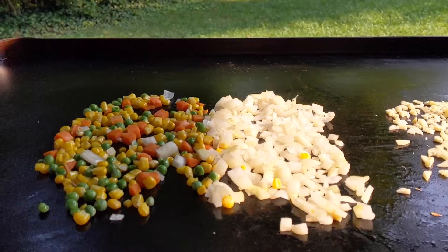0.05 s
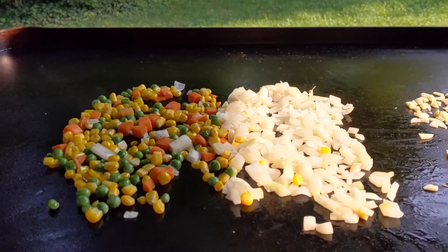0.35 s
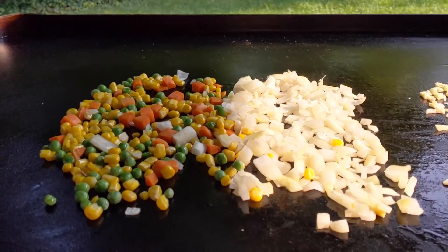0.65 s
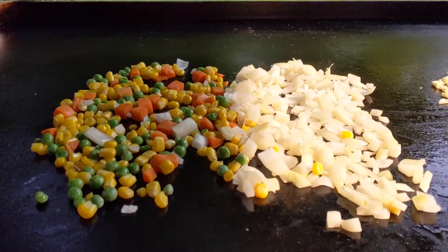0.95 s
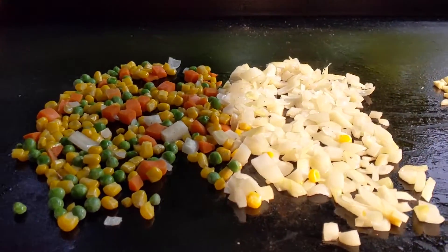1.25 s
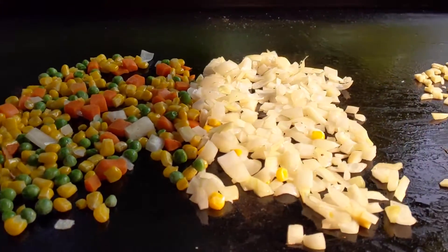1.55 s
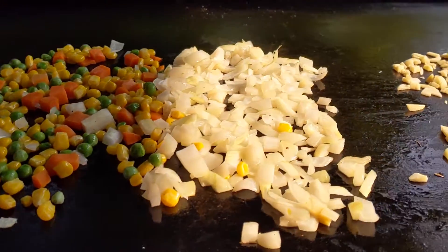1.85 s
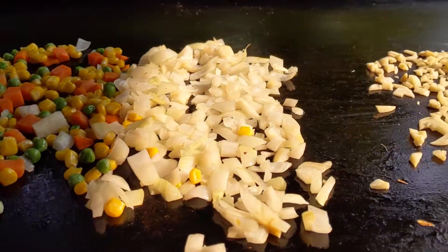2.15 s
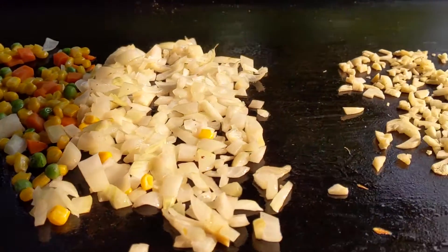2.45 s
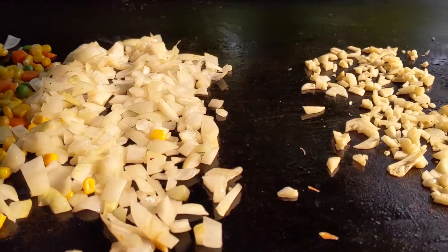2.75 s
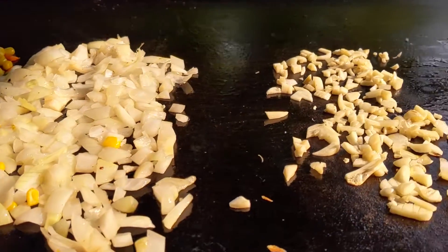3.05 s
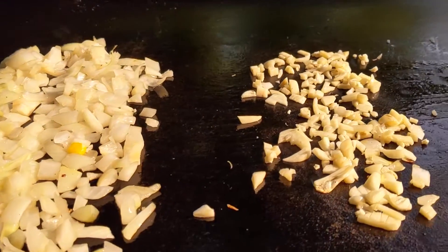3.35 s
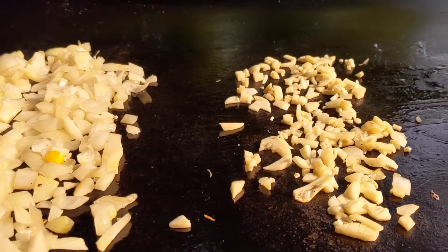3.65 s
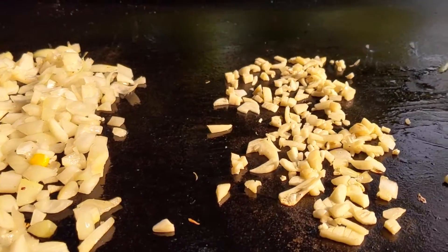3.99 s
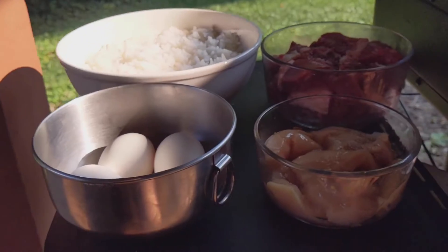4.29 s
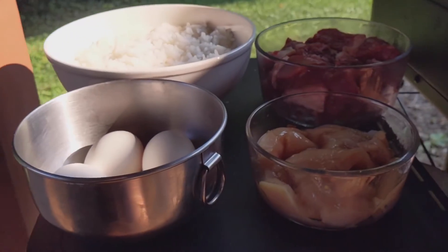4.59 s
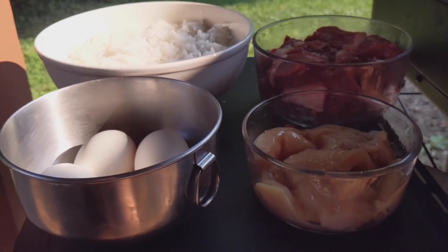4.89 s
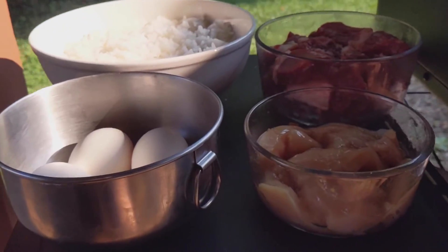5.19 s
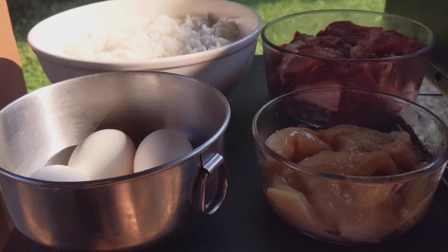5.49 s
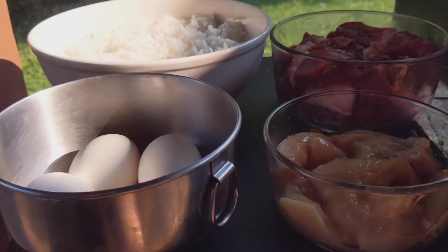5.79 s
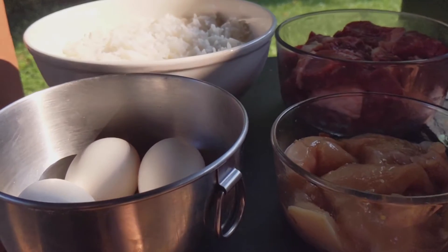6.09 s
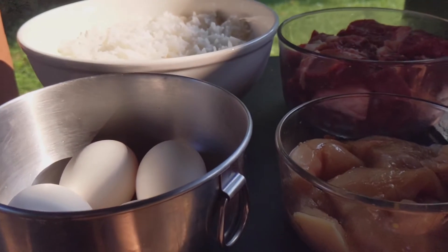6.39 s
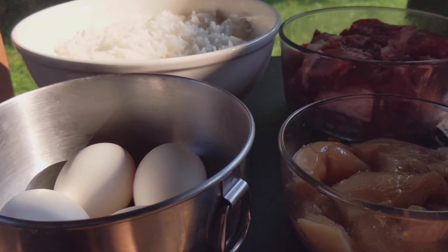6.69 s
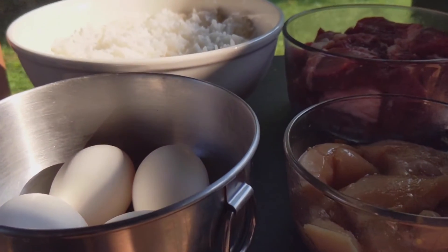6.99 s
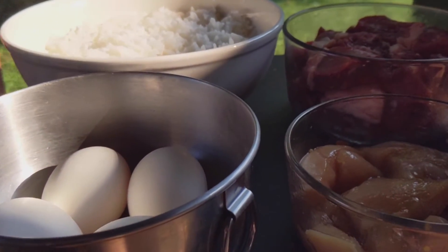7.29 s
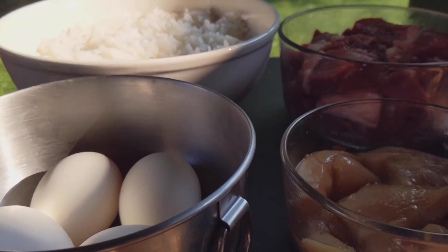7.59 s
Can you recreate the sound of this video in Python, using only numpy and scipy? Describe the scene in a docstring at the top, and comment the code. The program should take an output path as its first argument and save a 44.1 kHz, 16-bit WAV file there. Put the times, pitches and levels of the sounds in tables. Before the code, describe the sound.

Close up, vegetables fizz and crackle on a hot outdoor griddle while drops of water snap irregularly in the oil and a little steam spurts out. After about four seconds the frying drops away abruptly, as the microphone is now well back. Soft traffic rumble remains, with a faint far sizzle, a high trill that comes and goes, occasional ticks and a distant engine swelling gently near the end.

```python
"""Vegetables on an outdoor griddle

Close to the steel, the microphone pans across mixed vegetables, onion and garlic. Thousands of tiny
steam bubbles burst each second, drops of water pop in the oil, and distant traffic rumbles behind.
Then, from well back: rumble, a far engine, a thin hiss, a faint trill and a few ticks."""
import sys
import numpy as np
from scipy import signal
from scipy.fft import rfft, irfft, next_fast_len
from scipy.io import wavfile
from scipy.ndimage import map_coordinates

SR = 44100
rng = np.random.default_rng(int(sys.argv[2]) if len(sys.argv) > 2 else 0)


def to_wav(s):
    """Save 16-bit WAV."""
    ch = np.atleast_2d(s).T  # columns
    pcm = np.round(np.clip(ch, -1, 1) * 32767)  # PCM
    wavfile.write(sys.argv[1], SR, pcm.astype(np.int16))


N = 336924
TIME = np.arange(N) / SR
AWAY_S = 4.0892  # from here on the microphone stands well back


def amp(db):
    """Decibels to gain."""
    return 10 ** (np.asarray(db) / 20)


def unit(x):
    """Scale to rms 1."""
    return x / np.sqrt(np.mean(x ** 2) + 1e-20)


def along(rows, hz, column=1):
    """One column of a table, read on a log-frequency axis."""
    table = np.transpose(rows)
    return np.interp(np.log(hz + 1), np.log(table[0] + 1), table[column])


def curves(rows):
    """One value per sample for each column after the time."""
    times, *columns = np.transpose(rows)
    return [np.interp(TIME, times, column) for column in columns]


def wobble(rate):
    """A smooth random curve, rate knots a second."""
    return map_coordinates(rng.standard_normal(int(N * rate / SR) + 4), [TIME * rate])


def swells(rows):
    """Gain of bell-shaped swells."""
    return sum(amp(db) * np.exp(-((TIME - peak_s) / half_s) ** 2) for peak_s, half_s, db in rows)


def filtered(x, response):
    """x times a complex response of frequency."""
    size = 2 * next_fast_len(N // 2 + SR // 8)
    return irfft(rfft(x, size) * response(np.fft.rfftfreq(size, 1 / SR)), size)[..., :N]


def band(hz, centre_hz, width_hz):
    """Frequency response of one damped resonance."""
    return 1j * hz * width_hz / (centre_hz ** 2 - hz * hz + 1j * hz * width_hz)


def resonance(x, centre_hz, width_hz):
    """x through one damped resonance."""
    return filtered(x, lambda hz: band(hz, centre_hz, width_hz))


def coloured(x, table):
    """A causal, minimum-phase colour for each side of the microphone."""
    def response(hz):
        cepstrum = irfft(np.log(amp([along(table, hz, column=1), along(table, hz, column=2)])))
        half = cepstrum.shape[1] // 2
        cepstrum[:, 1:half] *= 2
        cepstrum[:, half + 1:] = 0
        return np.exp(rfft(cepstrum))
    return filtered(x, response)


def impulses(times, sizes, lag_ms):
    """Impulses placed between samples, reaching the left side lag_ms after the right."""
    sides = []
    for side in (.5, -.5):
        arrival = (times + side * lag_ms / 1000) * SR
        index = np.floor(arrival)[:, None] + np.arange(-3, 5)
        offset = index - arrival[:, None]
        taps = sizes[:, None] * np.sinc(offset) * np.sinc(offset / 4)
        sides.append(np.bincount(np.clip(index, 0, N).astype(int).ravel(), taps.ravel(), N + 1)[:N])
    return np.array(sides)


def bubbles(per_s, spread_db, lag_ms, width_ms):
    """Steam bubbles of log-normal size burst at random on a patch in direction lag_ms; rms 1."""
    count = int(per_s * N / SR)
    at = rng.uniform(0, N - 1, count)
    size, place, sign = rng.standard_normal((3, count))
    sizes = np.sign(sign) * amp(spread_db * np.minimum(size, 2.6))
    return unit(impulses(at / SR, sizes, lag_ms[at.astype(int)] + width_ms * place))


# Bearing of the onions as the microphone pans. Each row: time in seconds, lag of the left side in ms.
ONION_BEARING = [(0, -0.0051), (2.4, -0.064), (3.1, -0.22), (4.1, -0.25)]
ONION_LAG_MS, = curves(ONION_BEARING)
# Onion, vegetables, garlic. Each row: extra lag in ms, half width in ms, relative level in dB.
FOOD_PILES = [(0.00042, 0.047, 1), (-0.185, 0.052, -2.5), (0.33, 0.058, -11)]


def piles(per_s, spread_db):
    """Bubbles burst under all three piles of food; rms 1."""
    return unit(sum(amp(db) * bubbles(per_s, spread_db, ONION_LAG_MS + extra_ms, width_ms)
                    for extra_ms, width_ms, db in FOOD_PILES))


def sizzle():
    """Fine fizz and sparser crackle of escaping steam, over a lower sputter of thick juice."""
    farness = np.interp(TIME, [0, 1.13], [1, 0])  # the microphone closes in
    flare_db = 0.62 * wobble(7.59) + 0.7 * wobble(45)
    fizz_db = -45 - 4.5 * farness + flare_db
    juice_db = -43.5 - 3 * farness
    fizz = amp(fizz_db) * piles(per_s=9000, spread_db=4)
    crackle = amp(fizz_db - 4) * piles(per_s=220, spread_db=4.5)
    juice = amp(juice_db + 0.91 * wobble(11)) * piles(per_s=2400, spread_db=1.5)
    return resonance(fizz + crackle, 9550, 15200) + resonance(juice, 1330, 2430)


def spray(t60, size):
    """Spectrum of the short rush of spray after a burst, new every time."""
    t = np.arange(size) / SR
    fade = amp(-60 * t / t60) * (1 - np.exp(-t / 0.00056))
    return rfft(fade / np.linalg.norm(fade) * rng.standard_normal((2, size)))


# Brief ring of a burst cavity. Each row: multiple of the body pitch, width in Hz, relative level in dB.
CAVITY_MODES = [(0.55, 450, -15.5), (1, 380, -13.5), (2.15, 800, -14.5)]


def pops(drops, lag_ms, spray_db, spray_t60):
    """Water bursts in oil: a bright snap and a rounded body, lower for big drops, trailed by spray."""
    size, lead = 2048, 64
    hz = np.fft.rfftfreq(size, 1 / SR)
    out = np.zeros((2, N + size))
    rounded = band(hz, 2200, 13000) * np.exp(-(hz / 9500) ** 2)
    bright = amp(-1.5) * band(hz, 9800, 11200) + amp(-8) * band(hz, 11200, 1700)
    for s, body_db, snap_db, pitch_hz in drops:
        start = max(int(s * SR) - lead, 0)
        arrival_s = s - start / SR + np.array([[.5], [-.5]]) * lag_ms[start] / 1000
        spike = band(hz, pitch_hz, 2.1 * pitch_hz) * (1 + amp(spray_db) * spray(spray_t60, size))
        ring = sum(amp(db) * band(hz, ratio * pitch_hz, width) for ratio, width, db in CAVITY_MODES)
        body = amp(body_db + 3) * rounded * (spike + ring)
        snap = amp(snap_db) * bright * (1 + amp(-6) * spray(t60=0.0072, size=size))
        out[:, start:start + size] += irfft(np.exp(-2j * np.pi * hz * arrival_s) * (body + snap))
    return out[:, :N]


def small_drops(per_s=24, per_flurry=3, flurry_s=0.08, spread_db=2.5):
    """Rows for pops(): small drops burst in random flurries, some dull and some bright."""
    flurries = int(per_s * AWAY_S / per_flurry)
    draws = rng.uniform(size=(flurries, per_flurry, 5))
    starts = AWAY_S * draws[:, :1, 0] + flurry_s * draws[:, :, 1]
    body, snap, pitch = np.sqrt(12) * (draws[:, :, 2:].reshape(-1, 3).T - .5)  # variance 1
    body_db, snap_db = -24.5 + spread_db * body, -23.5 + spread_db * snap
    return np.column_stack([starts.ravel(), body_db, snap_db, 2380 * np.exp(0.35 * pitch)])


# Scatter off the griddle's steel walls. Each row: frequency in Hz, seconds to fall by 60 dB.
WALL_DECAY = [(500, 0.088), (3000, 0.078), (12000, 0.063)]


def wall_scatter(x, delay_s, decay=WALL_DECAY):
    """A diffuse tail; the bursts come from ever new spots, so each short block gets its own."""
    block, tail_length = SR // 40, SR // 10
    blocks = np.pad(x, ((0, 0), (0, -N % block))).reshape(2, -1, block)
    noise = rng.standard_normal((2, blocks.shape[1], tail_length))
    hz, t, spectra = signal.stft(noise, SR, nperseg=64)
    tails = signal.istft(spectra * amp(-60 * t / along(decay, hz)[:, None]), SR, nperseg=64)[1]
    tails /= np.linalg.norm(tails, axis=2, keepdims=True)
    wet = signal.fftconvolve(blocks, tails, axes=2)
    index = block * np.arange(wet.shape[1])[:, None] + np.arange(wet.shape[2]) + int(delay_s * SR)
    return np.array([np.bincount(index.ravel(), side.ravel())[:N] for side in wet])


# The loudest drops, close up. Each row: start in seconds, body and snap in relative dB, pitch in Hz.
LOUD_DROPS = [(0.0165, -14, -20, 2790), (0.0405, -21, -16.5, 3000), (0.1037, -11, -3.5, 3380),
              (0.2146, -5, -11, 1820), (0.2267, -34, -21, 2500), (0.2322, -37, -13, 3000),
              (0.3405, -18, -12.5, 2400), (0.3565, -13.5, -2.5, 2400), (0.366, -26, -7, 3000),
              (0.3755, -26, -10, 3000), (0.3926, -31, -12.5, 2500), (0.4447, -42, -12.5, 2500),
              (0.4962, -27, -18, 2500), (0.5542, -14, -24, 3300), (0.5857, -11.5, -26, 1100),
              (0.631, -21, -24, 2300), (0.7607, -26, -20, 2500), (0.7972, -24, -15.5, 2000),
              (0.9787, -27, -18, 2500), (1.0255, -19, -18, 1300), (1.2083, -17.5, -19, 1900),
              (1.2319, -10, -22, 1610), (1.2674, -27, -10.5, 3030), (1.3877, -10.5, -13, 3560),
              (1.4866, -15.5, -17, 1700), (1.5948, -27, -17.5, 2500), (1.6111, -16, -15, 2800),
              (1.6222, -18, -9.5, 2000), (1.6313, -19, -10, 2500), (1.712, -19, -17.5, 2500),
              (1.7311, -14.5, -11, 2000), (1.8057, -0.5, -2.5, 1600), (1.9564, -5.5, -10, 1950),
              (1.9722, -28, -15, 2000), (2.007, -27, -12, 2800), (2.0558, -30, -21, 2500),
              (2.1235, -32, -24, 2000), (2.2433, -10, -11, 3300), (2.2671, -23, -12, 2500),
              (2.2722, -18, -14, 1800), (2.399, -28, -20, 2500), (2.453, -32, -15, 2500),
              (2.4894, -35, -15, 2480), (2.6204, -20, -8.5, 3000), (2.707, -27, -21, 2500),
              (2.7113, -11, -6, 2700), (2.9028, -28, -18, 2000), (2.9737, -14, -5, 2200),
              (2.9768, -23, -14, 2500), (3.0804, -18, -4.5, 2000), (3.1436, -3.5, -30, 2100),
              (3.1693, -16, -21, 2600), (3.1991, -26, -19, 2500), (3.2454, -10.5, -11.5, 2800),
              (3.278, -28, -13.5, 2500), (3.336, -21, -13.5, 3500), (3.3948, -20, -18, 2600),
              (3.5458, -23, -13, 2500), (3.7979, -20, -13, 2000), (3.8503, -25, -15, 2500),
              (3.8857, -28, -17, 2500), (3.9236, -12.5, -24, 2800), (4.002, -21, -24, 2600)]
# Colour with the microphone on the vegetables, then on the garlic.
# Each row: frequency in Hz, left gain in dB, right gain in dB.
VEGETABLE_COLOUR = [(507, -12.5, -7.5), (860, -8, -8), (1980, -5, -1.3), (2650, -11, -6.5), (2870, 0, -13),
                    (3820, -3, -1.5), (5340, -0.5, -0.5), (7360, -4.5, -6.5), (10100, 0.5, -4),
                    (11400, -3.5, 1.5), (12500, -7, 3), (14100, -5, 0.5), (15000, -11, -8),
                    (15800, -2.5, -11)]
GARLIC_COLOUR = [(500, -5.5, -7), (900, -7, -6), (1480, -7, -3), (1920, -11, -5.5), (2280, -2.5, -4.5),
                 (2620, -0.5, -14.5), (3420, -1, -3), (4450, -2.5, -1), (5840, 0, -2.5), (6800, -3, -7.5),
                 (9300, -1, -4.5), (10300, 0.5, -4), (11350, -4.5, 4), (12100, -1.5, -5.5),
                 (12900, -0.5, -1.5), (14500, -2, -3), (15600, -7, -10)]


def near_griddle():
    """Frying and popping close up, scattered by the steel; the colour turns with the microphone."""
    frying = sizzle() + steam_spurts() + wet_sputters()
    drops = np.vstack([LOUD_DROPS, small_drops()])
    popping = pops(drops, ONION_LAG_MS, spray_db=-5, spray_t60=0.0042)
    walls = wall_scatter(amp(-7.5) * frying + amp(-10) * popping, delay_s=.0013)
    heard = frying + popping + walls
    turned = np.interp(TIME, [1.3, 3.2], [0, 1])
    return (1 - turned) * coloured(heard, VEGETABLE_COLOUR) + turned * coloured(heard, GARLIC_COLOUR)


# Traffic, beside the griddle and well back. Each row: frequency in Hz, relative density in dB.
NEAR_TRAFFIC_SPECTRUM = [(11, -59), (18, -4.5), (65, 1.5), (97, -3), (124, -9), (146, -11), (228, -17),
                         (255, -18), (291, -13.5), (321, -15), (354, -19.5), (384, -18), (900, -20.5),
                         (1170, -27.5), (1980, -120)]
AWAY_TRAFFIC_SPECTRUM = [(11, -46), (26, -1.5), (38, -6), (54, -2), (91, -0.5), (172, -12.5), (253, -16.5),
                         (292, -17.5), (320, -20.5), (391, -20.5), (505, -22), (714, -22.5), (990, -28),
                         (1150, -31.5), (1230, -51), (1400, -34), (1820, -74), (3080, -120)]
# Its slow rise and fall at each spot. Each row: time in seconds, level in dB.
NEAR_TRAFFIC_LEVEL = [(0, -56.5), (1.1, -55), (4.09, -55)]
AWAY_TRAFFIC_LEVEL = [(4.1, -53), (4.55, -53), (4.72, -51), (4.92, -54.5), (5.15, -52.5), (5.55, -54),
                      (5.85, -53), (6.3, -53), (7.6, -53.5)]
# Its likeness across the microphone. Each row: frequency in Hz, left-right correlation.
TRAFFIC_COHERENCE = [(25, 0.62), (70, 1), (160, 0.96), (350, 0.81), (700, 0.57), (1400, 0.25)]


def traffic(spectrum, level):
    """Distant traffic and moving air rumble, nearly the same on both sides in the bass."""
    def mid_side_colour(hz):
        angle = np.arccos(np.clip(along(TRAFFIC_COHERENCE, hz), -1, 1)) / 2
        return amp(along(spectrum, hz)) * [np.cos(angle), np.sin(angle)]
    mid, side = filtered(rng.standard_normal((2, N)), mid_side_colour)
    level_db = curves(level)[0] + 0.62 * wobble(7)
    return amp(level_db) * unit(np.array([mid + side, mid - side]))


# A distant motor heard beside the griddle, and a low drone heard from well back.
# Each row: frequency in Hz, level in dB.
MOTOR_TONES = [(121.5, -65), (358, -78)]
DRONE_TONES = [(56, -64), (91, -63.5), (127, -67)]


def machine(tones, drift, waver_db):
    """Tones of a far machine: its speed drifts and the air makes each tone waver."""
    clock = np.cumsum(1 + drift * wobble(4.03)) / SR
    return sum(amp(db + waver_db * wobble(6)) * np.sqrt(2) * np.sin(2 * np.pi * hz * clock)
               for hz, db in tones)


# Wet sputters, close up. Each row: peak time in seconds, half length in seconds, level in dB.
SPUTTER_SWELLS = [(0.595, 0.025, -53), (1.218, 0.027, -51)]


def wet_sputters(pitch_hz=2250):
    """A wet pocket bubbles over for a moment: a quick run of larger bubbles of like pitch."""
    run = bubbles(per_s=500, spread_db=3, lag_ms=ONION_LAG_MS, width_ms=0.03)
    pitched = resonance(resonance(run, pitch_hz, 650), pitch_hz, 900)
    return swells(SPUTTER_SWELLS) * unit(pitched)


# Escaping steam, close up. Each row: peak time in seconds, half length in seconds, level in dB.
STEAM_SWELLS = [(3.188, 0.019, -44.5), (3.67, 0.14, -45)]


def steam_spurts():
    """Trapped juice escapes from one small spot under the onions: a swell of fine, bright bursts."""
    jet = bubbles(per_s=9000, spread_db=3.4, lag_ms=ONION_LAG_MS, width_ms=0.012)
    bright = resonance(jet, 11200, 2000) - 0.55 * resonance(jet, 3700, 1500)
    return swells(STEAM_SWELLS) * unit(bright)


# The sizzle from well back. Each row: frequency in Hz, left and right gain in relative dB.
FAR_COLOUR = [(308, -17.5, -11), (875, -3.5, -3.5), (1500, -3.5, -2), (2370, -7.5, -6.5), (3500, -8.5, -11),
              (5230, -8, -8), (7650, -15, -14), (9700, -10.5, -8), (11400, -15.5, -12.5),
              (13300, -22, -8.5), (14600, -27, -16.5)]
# Narrow bands in that hiss. Each row: centre in Hz, width in Hz, gain in dB.
FAR_BANDS = [(9800, 300, -13), (11780, 170, -1), (13620, 150, 1)]
# Pops that carry this far. Each row: start in seconds, body and snap in relative dB, pitch in Hz.
FAR_DROPS = [(5.0356, -33, -43, 2900), (5.5056, -31, -38, 3200), (5.5583, -30, -33, 3000),
             (7.3664, -26.5, -26, 2800), (7.3745, -33, -31, 3200)]


def far_griddle(top_hz=15100, fade_db_per_s=0.44):
    """The griddle far off to the right: slowly sinking diffuse hiss, wavering bands, a rare tick."""
    lag_ms = np.full(N, 0.324)
    direct = bubbles(per_s=5000, spread_db=5.8, lag_ms=lag_ms, width_ms=0.04)
    hiss = unit(direct + 1.46 * rng.standard_normal((2, N)))
    bands = sum(amp(db + 1.6 * wobble(6.4)) * resonance(hiss, hz, width) for hz, width, db in FAR_BANDS)
    ticks = pops(FAR_DROPS, lag_ms, spray_db=0, spray_t60=0.0093)
    tails = wall_scatter(ticks, delay_s=.005, decay=[(1000, .06), (10000, 0.093)])
    hiss_db = -60 - fade_db_per_s * (TIME - AWAY_S)
    frying = amp(hiss_db) * unit(coloured(hiss + bands, FAR_COLOUR))
    popping = resonance(ticks, 5300, 12000) + amp(2.5) * resonance(tails, 4500, 3000)
    return filtered(frying + popping, lambda hz: hz < top_hz)


# A faint trill. Each row: peak time in seconds, half length in seconds, level in dB.
TRILL_SWELLS = [(4.17, 0.06, -74.5), (4.34, 0.04, -74.5), (4.88, 0.12, -76), (5.25, 0.1, -78),
                (5.71, 0.07, -73), (6.06, 0.08, -74), (6.55, 0.06, -71)]


def trill(pitch_hz=5060, width_hz=330):
    """A narrow, high rasp that comes and goes, like an insect far off in the grass."""
    noise = rng.standard_normal((2, N))
    rasp = resonance(resonance(noise, pitch_hz, width_hz), pitch_hz, width_hz)
    return swells(TRILL_SWELLS) * unit(rasp)


# A vehicle in the distance. Each row: time in seconds, engine note in Hz, level in dB.
VEHICLE_NOTE = [(4.2, 219, -85), (4.31, 211.7, -66), (4.45, 199.3, -63.5), (4.6, 200, -70), (4.9, 200, -74),
                (5.3, 200, -110)]


def vehicle():
    """A far vehicle eases off: its engine note sinks and fades into the rumble."""
    hz, db = curves(VEHICLE_NOTE)
    return amp(db + 1.5 * wobble(13)) * np.sqrt(2) * np.sin(2 * np.pi * np.cumsum(hz) / SR)


# An engine in the distance. Each row: frequency in Hz, level in dB before the swell.
ENGINE_TONES = [(151, -69), (195, -74), (216, -70), (260, -76), (281, -75)]


def far_engine():
    """The hum of a far engine swells in towards the end."""
    swell = np.interp(TIME, [6.0, 6.5, 7.4], [0, 0.9, 1.2])
    return swell * machine(ENGINE_TONES, drift=0.0033, waver_db=2)


def scene():
    """First beside the griddle, then, after a brief dip in level, well back from it."""
    near = near_griddle() + traffic(NEAR_TRAFFIC_SPECTRUM, NEAR_TRAFFIC_LEVEL)
    near += machine(MOTOR_TONES, drift=0.00837, waver_db=3)
    away = far_engine() + far_griddle() + traffic(AWAY_TRAFFIC_SPECTRUM, AWAY_TRAFFIC_LEVEL)
    away += machine(DRONE_TONES, drift=0.0202, waver_db=2.2) + vehicle() + trill()
    dip = np.where(TIME < 4.1037, amp(-16), 1)
    return np.where(TIME < AWAY_S, near, dip * away)


def record(dry):
    """The microphone keeps nothing above its band limit and rounds off the tallest spikes."""
    top_hz, ceiling = 15900, 0.24
    low_pass = lambda hz: np.clip((top_hz - hz) / 300 + .5, 0, 1)
    kept = filtered(dry, low_pass)
    rounded = kept / (1 + (kept / ceiling) ** 4) ** (1 / 4)
    return filtered(rounded, low_pass)


dry = scene()
out = record(dry)
to_wav(out)
```